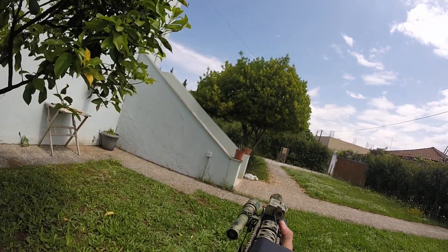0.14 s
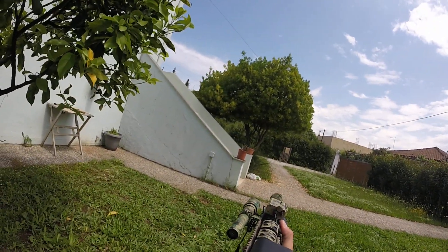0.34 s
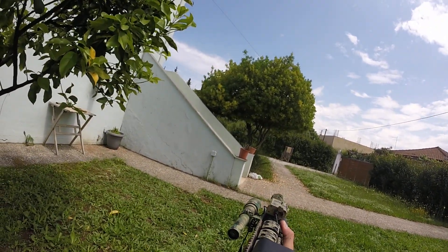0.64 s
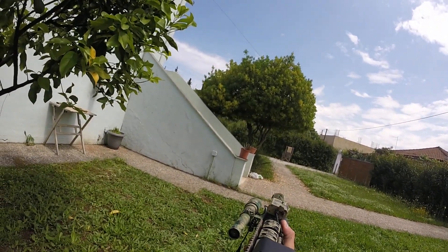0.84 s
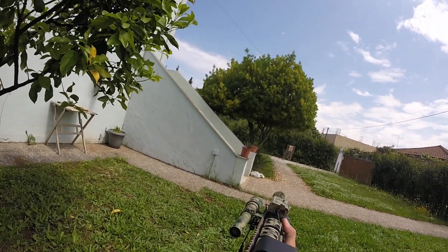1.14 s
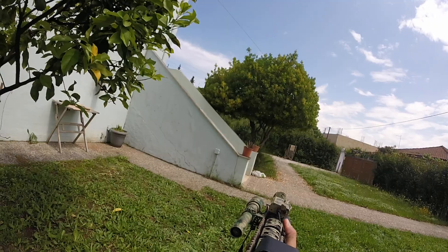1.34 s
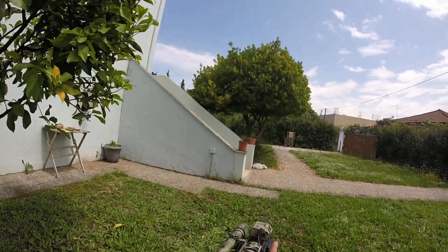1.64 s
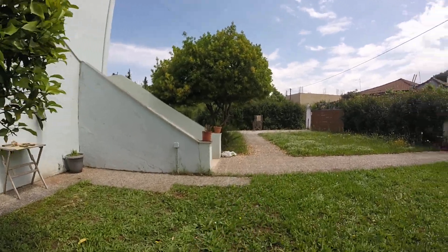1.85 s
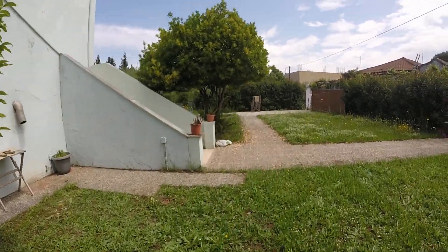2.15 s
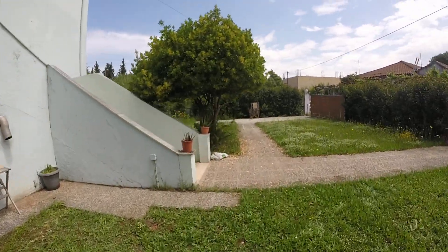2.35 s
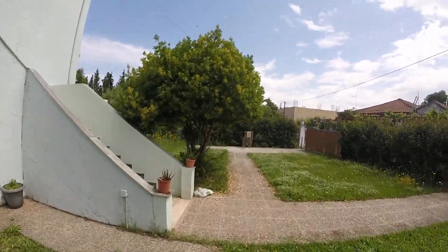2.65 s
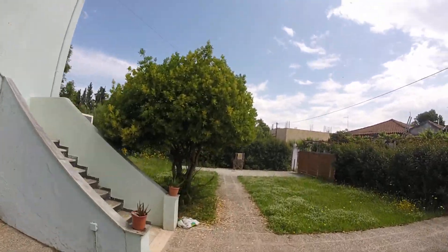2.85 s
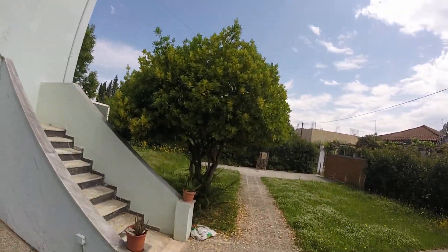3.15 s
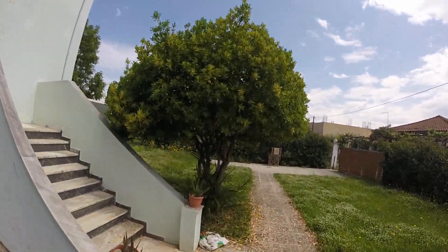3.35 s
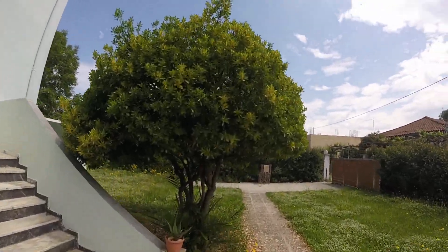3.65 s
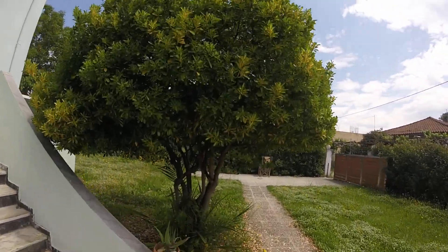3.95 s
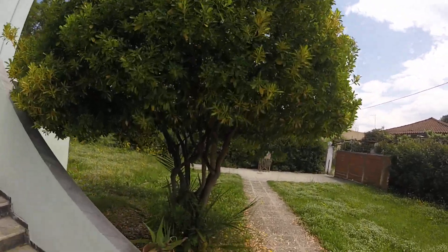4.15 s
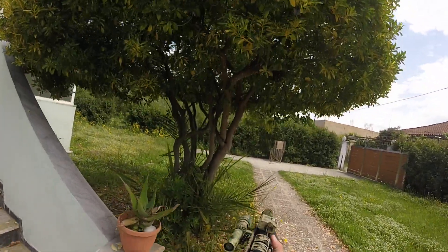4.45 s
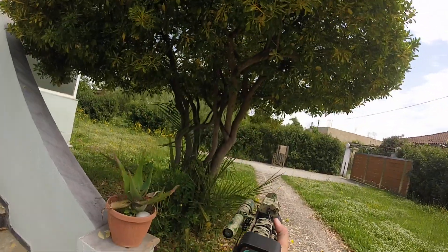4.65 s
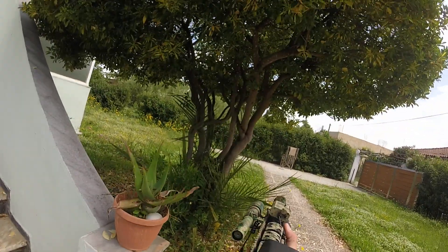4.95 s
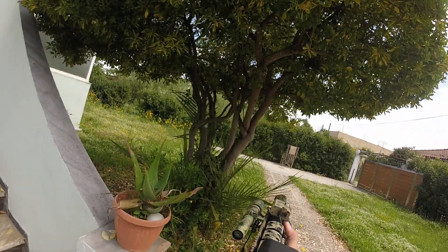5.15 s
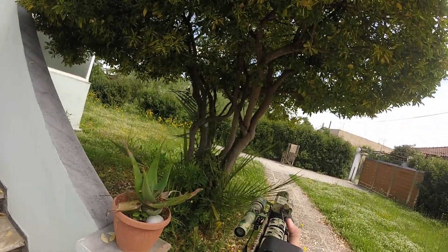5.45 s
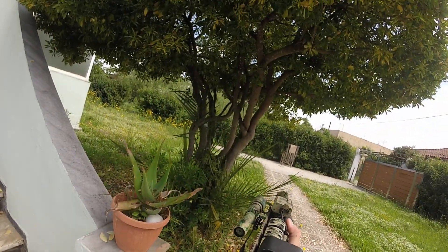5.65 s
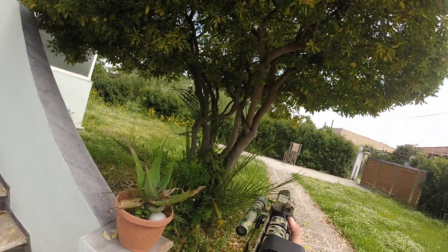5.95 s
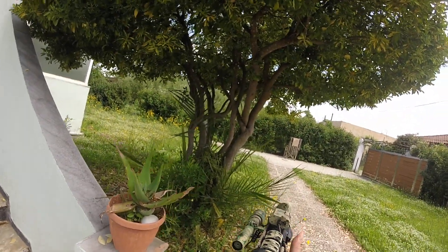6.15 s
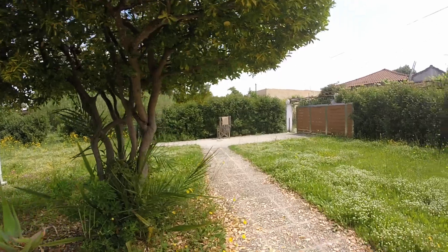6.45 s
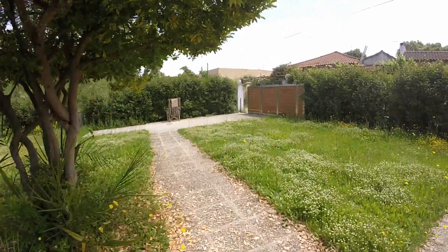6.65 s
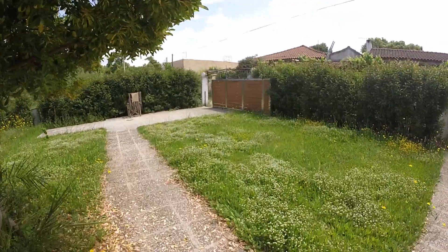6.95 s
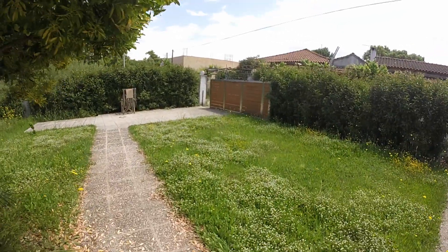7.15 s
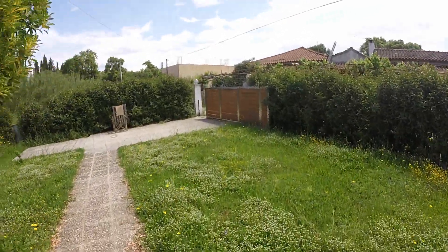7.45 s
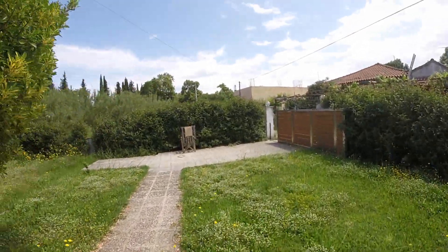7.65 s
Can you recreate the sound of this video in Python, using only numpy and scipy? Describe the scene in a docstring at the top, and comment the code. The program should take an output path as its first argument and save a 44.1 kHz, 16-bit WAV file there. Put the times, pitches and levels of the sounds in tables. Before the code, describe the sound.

A quiet garden opens with soft wind on the microphone, a distant hush, a low engine drone fading within the first second and one faint chirp. At 1.07 s a trigger clicks; from 1.15 s an electric airsoft rifle fires four dry, clacking shots at about 14 per second, its gears whirring and rasping between slams, with a thin bright echo. Faint metal pings answer from afar, and a latch clacks with a bounce at 1.47 s. From 1.9 to 4.4 s the shooter walks: dull bumps, cloth rustle, small clicks and hollow case knocks, hardest at 3.4 and 3.77 s, with birds and a faint falling whine near 3 s. After a lull with light chirps at 5 s, six shots run from 5.66 to 6.0 s, ending in a latch clack at 6.12 s. Clicks, rustles, soft knocks and rising gusts continue to about 8 s.

```python
"""A breeze brushes the microphone over a distant hush and engine drone, small birds twitter, then an electric
airsoft rifle fires a burst in a walled garden, heard from a camera worn by the shooter; a longer one follows.
Its gears whirr, wind the spring and let the piston slam about 14 times a second; the walls return an echo and
the first burst's pellets ping on metal far off. As the shooter walks, the camera case knocks and kit rustles.
Noise is filtered for wind, gears, cloth and hush; decaying sines ring for struck parts; swept sines whistle."""
import sys
import numpy as np
from scipy import signal
from scipy.fft import rfft, irfft
from scipy.io import wavfile
from scipy.ndimage import uniform_filter1d, minimum_filter1d

SR = 44100
rng = np.random.default_rng(int(sys.argv[2]) if len(sys.argv) > 2 else 0)


def transcribe(signal):
    """Save signal, clipped to [-1, 1], as a 16-bit WAV file at the path in sys.argv[1]."""
    frames = np.atleast_2d(signal).T
    limited = np.clip(frames, -1, 1)
    pcm = np.round(limited * 32767).astype(np.int16)
    wavfile.write(sys.argv[1], SR, pcm)


N = 344362
T = np.arange(N) / SR   # s
AGE = T[:SR // 2]   # s since a blow

# In every colour table the levels are relative: the filter keeps the power of white noise.
# Colour of the far outdoor hush. Each row: frequency in Hz, level in dB per Hz.
HUSH_COLOUR = [(88, -40), (150, -5), (205, -12), (258, -10.5), (404, -16), (781, -13), (877, -14.5),
               (1130, -14), (1510, -17), (1700, -23), (2100, -27), (3350, -33.5), (5650, -40),
               (13300, -54.5), (15500, -82)]
HUSH_DB = -45
# Low rumble of wind at the microphone. Each row: frequency in Hz, level in dB per Hz.
RUMBLE_COLOUR = [(12, -50.5), (20, -3.5), (44, 6), (60, 2), (76, 3), (107, -0.5), (189, -20), (296, -15.5),
                 (400, -21), (520, -41.5), (880, -120)]
# Eddies of the stronger wind. Each row: frequency in Hz, level in dB per Hz.
EDDY_COLOUR = [(50, -17.5), (130, 7.0), (250, -1.0), (450, -11.0), (2000, -55.0)]
# Gusts at the microphone. Each row: strongest moment in seconds, half width in seconds, flow in dB.
GUSTS = [(.3, 0.77, -40.5), (2, 0.6, -45), (4.901, 0.46, -55), (7.5, .12, -37), (7.8, 0.18, -35)]
BREEZE_DB, LUMPY_DB = -43, 1.6   # flow between gusts; spread of its quick flutter
# Lines of the distant engine. Each row: frequency in Hz, level in dB.
DRONE_LINES = [(54, 0), (108, -3), (152, -36)]
DRONE_DB, DRONE_ATTACK_S, DRONE_HOLD_S, DRONE_RELEASE_S = -28.5, 0.15, 0.39, 0.33
# Small birds. Each row: start in seconds, starting pitch in Hz, level in dB.
CHIRPS = [(.45, 3270, -54), (3.03, 3500, -52), (3.455, 4680, -53.5), (3.638, 3430, -47), (5.022, 3180, -57),
          (5.052, 3200, -53.5)]
CHIRP_S, CHIRP_RISE = 0.019, 1.5   # length; end pitch over starting pitch

# Bursts of the rifle. Each row: trigger pulled in seconds, first slam in seconds, number of shots,
# time lost while the motor gathers speed in seconds, latch drops in seconds, latch level in dB.
BURSTS = [(1.066, 1.149, 4, .008, 1.4734, -7.5), (5.586, 5.657, 6, .012, 6.1183, -5)]
SHOT_PERIOD_S, LAG_LEFT = .069, .15   # at full rate; share of the lag left after each shot
# The trigger's click: level in dB, brightness in Hz, time to fall 60 dB in seconds.
TRIGGER_CLICK = (-21.5, 5400, 0.015)
LATCH_HZ, LATCH_T60_S = 15000, 0.035   # brightness and decay of the latch's clack
REBOUND_S, REBOUND_DB, REBOUND_T60_S = .0195, -6.5, 0.064   # its one bounce: delay, level against the drop
# Colour of the gearbox close by. Each row: frequency in Hz, level in dB per Hz.
GEARBOX_COLOUR = [(120, -62), (200, -11), (430, -4.5), (554, -8.5), (874, 2), (1030, -4.5), (1430, 0.5),
                  (1810, -13), (2130, -15), (2470, -16.5), (5490, -18.5), (7090, -18.5), (8050, -23),
                  (11600, -23.5), (15500, -40)]
# Resonances of the gearbox. Each row: frequency in Hz, width in Hz, lift in dB.
GEARBOX_PEAKS = [(427, 29, 2.2), (960, 19, 3.8), (1450, 210, 2.1), (1947, 220, 7.7), (2430, 250, 8.3),
                 (2820, 35, 1.7), (3920, 400, 7.3), (4260, 99, 7.8), (6130, 110, 8), (7040, 230, 3.6)]
# Receiver ringing when struck. Each row: frequency in Hz, level in dB, time to fall 60 dB in seconds.
RECEIVER_MODES = [(213, -19, 0.073), (476, -2.5, 0.041), (843, 1, 0.052), (893, -15.5, 0.046),
                  (1106, 1.5, 0.021), (1487, -10, 0.039)]
# Rasp of strained teeth. Each row: frequency in Hz, level in dB per Hz.
RASP_COLOUR = [(700, -28), (1300, 1.0), (1700, 5.0), (2200, -3), (3000, 1.0), (4600, -11.5),
               (5500, -41.5), (12000, -39)]
# Resonance of that rasp. Each row: frequency in Hz, width in Hz, lift in dB.
RASP_PEAKS = [(2670, 360, 3)]
START_SPEED, SPIN_UP_S, COAST_S = .3, .016, .108   # share of full speed at once; run-up; run-down
GEARS_DB, SPEED_EXPONENT = -20, 2.16   # gears at full speed; growth of their gain with speed
TOOTH_HZ, SPRING_SAG = 964, .15   # free tooth rate; share lost against the fully wound spring
PICKUP_S, PICKUP_WIDTH_S, PICKUP_DB = 0.02, 0.0041, 3.5   # after a slam the gear catches the piston again
SHAKE_DB, SHAKE_S = 1, .006   # a slam shakes the gears into a brief clatter
FREE_DB, FREE_S = -9, .0055   # the gears spin unloaded while the piston flies
SHOT_DB, FIRST_SHOT_LIFT_DB, SLAM_DB = -3.3, 2, 2.5   # shot force; lift of the first; slam within a shot
# The slam builds up as the piston squeezes its air, then the shooter's grip damps it.
CUSHION_S, DAMPING_S = .0022, .007
# Echo off the garden's leaves and walls. Each row: frequency in Hz, level in dB per Hz.
ECHO_COLOUR = [(200, -31), (700, -11), (1800, -4.5), (4000, 6), (7000, 6), (12000, 4.5), (16000, 7.5)]
ECHO_DB = -13
# Far metal hit by pellets. Each row: frequency in Hz, level in dB, time to fall 60 dB in seconds.
METAL_MODES = [(3710, 16, 0.06), (3940, 3, .2), (10605, 0.5, 0.16), (11450, -1, 0.12)]
# Pings, one for each pellet of the first burst. Each entry: peak in dB.
PING_DB = [-57, -51, -34.5, -45.5]
PELLET_FLIGHT_S = .282

# Dull bumps through the camera mount. Each row: start in seconds, level in dB, frequency in Hz.
BUMPS = [(1.929, -21, 101), (2.572, -22, 172), (3.338, -9, 159), (3.379, -13, 143), (7.63, -13, 122)]
# Strokes of sleeves and kit by the microphone. Each row: start in seconds, length in seconds, level in dB.
BRUSHES = [(2.108, 0.62, -51.5), (2.75, 0.41, -49), (4.289, 0.049, -40.5), (6.314, 0.35, -53.5),
           (6.717, 0.31, -46.5), (7.045, 0.11, -31.5), (7.134, 0.11, -43), (7.481, 0.11, -35),
           (7.58, 0.093, -45), (7.737, 0.081, -42.5)]
# Colour of cloth. Each row: frequency in Hz, level in dB per Hz.
CLOTH_COLOUR = [(400, 1), (900, 5), (1500, 2.5), (2500, -5.5), (4000, -9.5), (7000, -17.5), (11000, -21),
                (15000, -32)]
# Gritty low catch of cloth. Each row: frequency in Hz, level in dB per Hz.
CATCH_COLOUR = [(600, -32), (1100, 4), (1600, -4), (2400, -14.0), (4000, -26), (10000, -35)]
# Loose parts of the rifle. Each row: start in seconds, level in dB, brightness in Hz,
# time to fall 60 dB in seconds.
LOOSE_CLACKS = [(2.195, -24, 1030, 0.027), (2.221, -29, 1150, 0.073), (2.538, -25.5, 890, 0.013),
                (6.425, -21.5, 1950, 0.035), (6.791, -20.5, 1080, .008), (6.812, -20, 1770, .004),
                (6.819, -16.5, 1700, .019), (6.827, -23.5, 2500, 0.039), (7.504, -18.5, 1550, 0.058),
                (7.522, -8, 3400, 0.0065), (7.56, -19.5, 2980, 0.0086)]
# Knocks of the camera case. Each row: start in seconds, hollow thud in dB, hard snap in dB.
KNOCKS = [(2.571, -23, -42), (3.164, -18, -36), (3.26, -7.5, -26), (3.286, -7.5, -18.5), (3.3115, -21, -33),
          (3.335, -12, -38), (3.38, -18, -27), (3.3998, 4, 3.5), (3.4117, -7.5, -8.5), (3.6931, -10, -26),
          (3.745, -24, -33), (3.7702, -1.5, -1), (3.7885, -6.5, -11), (4.1096, -13.5, -38),
          (4.156, -15, -23.5), (4.202, -15.5, -27), (4.352, -15, -44), (4.4, -21, -59), (7.131, -26, -45),
          (7.198, -21.5, -54), (7.336, -24.5, -54), (7.63, -14.5, -39)]
# Hollow shell of the case. Each row: frequency in Hz, level in dB, time to fall 60 dB in seconds.
SHELL_MODES = [(322.4, -0.5, 0.032), (456, -2.5, 0.024), (670, -1, 0.0095), (792, -4, .028),
               (970, -4.5, 0.019), (1100, -7, 0.019), (1370, -2, 0.0083)]
# Stiff walls of the case. Each row: frequency in Hz, level in dB, time to fall 60 dB in seconds.
WALL_MODES = [(2333, -1.5, 0.032), (3007, -4.5, 0.026), (3500, -3.5, .016), (3560, -11, 0.035),
              (4552, -7, 0.034), (5630, -8, 0.017), (7000, -4, 0.0081), (7480, -9, 0.012),
              (9360, -19, 0.01), (10580, -17.5, 0.015)]
CHATTER = .3   # strength of the tiny rebounds within a knock
# Faint far whine. Each row: start in seconds, length in seconds, level in dB.
FAR_WHINES = [(2.8, .5, -47)]
WHINE_HZ, WHINE_SAG_HZ_PER_S = 1240, 290
# The case drags in its mount. Each row: start in seconds, length in seconds, level in dB.
DRAGS = [(3.26, 0.18, -30.5), (3.685, 0.062, -21.5), (4.045, 0.1, -34), (4.33, 0.055, -45)]
CUTOFF_HZ = 15600   # top of the recorded band


def from_db(db):
    """Decibels to gain."""
    return 10 ** (np.asarray(db) / 20)


def rms_one(x):
    """Scale to unit rms."""
    return x / np.sqrt(np.mean(x ** 2) + 1e-20)


def peak_one(x):
    """Scale to unit peak."""
    return x / (np.abs(x).max() + 1e-20)


def noise(size=N):
    """White noise of spread 1."""
    return rng.standard_normal(size)


def add(out, s, sound):
    """Mix a sound in at a time."""
    i = round(s * SR)
    out[i:i + len(sound)] += sound[:N - i]


def fade(t60):
    """Exponential decay after a blow, 60 dB in t60 seconds."""
    return from_db(-60 * AGE / max(t60, 1e-3))


def ring(hz, t60):
    """One decaying sine after a blow."""
    return np.sin(2 * np.pi * hz * AGE) * fade(t60)


def swells(rows):
    """Strokes that rise quickly and ease off."""
    return sum(from_db(db) * np.sin(np.pi * np.clip((T - s) / length, 0, 1) ** .7) for s, length, db in rows)


def drift(rate):
    """Random wander of unit rms, with straight lines between `rate` fresh values a second."""
    knots = np.arange(0, T[-1] + 1, 1 / rate)
    return rms_one(np.interp(T, knots, noise(len(knots))))


def lowpass(x, hz):
    """Second-order low-pass."""
    return signal.sosfilt(signal.butter(2, min(hz, SR * .45), fs=SR, output="sos"), x + 1e-18)


def colour(x, spectrum, peaks=(), size=4096):
    """Causal filter with a smooth spectrum and resonances on top; white noise keeps its power."""
    hz = np.maximum(np.fft.rfftfreq(size, 1 / SR), 1)
    points = np.array(spectrum)
    db = np.interp(np.log(hz), np.log(points[:, 0]), points[:, 1])
    for centre, width, lift in peaks:
        db = db + lift / (1 + (2 * (hz - centre) / width) ** 2)
    # the folded cepstrum gives a minimum-phase response
    cepstrum = irfft(np.log(from_db(db)))[:size // 2]
    response = irfft(np.exp(2 * rfft(cepstrum, size)))
    return signal.oaconvolve(x, response / np.linalg.norm(response))[:len(x)]


def struck(modes, spread_db, detune=0):
    """Modes of alternating sign ring after a blow, each with a strength of its own."""
    gains = from_db(spread_db * noise(len(modes)))
    shifts = 1 + detune * noise(len(modes))
    total = np.zeros(len(AGE))
    for k, (hz, db, t60) in enumerate(modes):
        total += (-1) ** k * gains[k] * from_db(db) * ring(hz * shifts[k], t60)
    return peak_one(total)


def hush():
    """Steady distant outdoor hush: coloured noise."""
    return from_db(HUSH_DB) * colour(noise(), HUSH_COLOUR)


def wind(buffet_db=-11, buffet_exponent=1.79):
    """A lumpy breeze on the microphone, whose eddies reach higher in the gusts."""
    gusts = sum(from_db(db) * np.exp(-((T - s) / width) ** 2) for s, width, db in GUSTS)
    flow = from_db(BREEZE_DB) + gusts
    rumble = colour(noise(), RUMBLE_COLOUR)
    eddies = colour(noise(), EDDY_COLOUR)
    buffet = from_db(buffet_db) * (flow / np.mean(flow)) ** buffet_exponent
    return flow * from_db(LUMPY_DB * drift(14)) * (rumble + buffet * eddies)


def engine():
    """A distant engine drones and fades: low sines that share one unsteady pitch."""
    wander = np.cumsum(1 + 0.021 * drift(8)) / SR
    turns_s = np.cumsum([0, DRONE_ATTACK_S, DRONE_HOLD_S, DRONE_RELEASE_S])
    throttle = np.interp(T, turns_s, [0, 1, 1, 0])
    lines = sum(from_db(DRONE_DB + db + 2 * drift(8.8)) * np.sin(2 * np.pi * hz * wander)
                for hz, db in DRONE_LINES)
    return throttle * lines


def birds():
    """Small birds twitter: short rising whistles."""
    out = np.zeros(N)
    for s, hz, db in CHIRPS:
        glide_hz = np.linspace(hz, hz * CHIRP_RISE, round(CHIRP_S * SR))
        whistle = np.sin(2 * np.pi * np.cumsum(glide_hz) / SR)
        add(out, s, from_db(db) * np.hanning(len(whistle)) * whistle)
    return out


def clack(t60, bright_hz):
    """A chatter of contacts in the gearbox that builds up and dies quickly."""
    contacts = np.tanh(2 * noise(len(AGE))) * (fade(t60) - 0.95 * fade(t60 / 4))
    return peak_one(lowpass(colour(contacts, GEARBOX_COLOUR, GEARBOX_PEAKS), bright_hz))


def clacks(rows, hollow_db=-10):
    """Contacts on the rifle; the duller ones bring out more of the hollow receiver."""
    out = np.zeros(N)
    for s, db, bright_hz, t60 in rows:
        receiver = peak_one(lowpass(struck(RECEIVER_MODES, 1.8), 590))
        hollow = from_db(hollow_db) * min(2000 / bright_hz, 1) * receiver
        add(out, s, from_db(db) * (clack(t60, bright_hz) + hollow))
    return out


def latches():
    """The trigger clicks; after a burst the gear train drops back on its latch and bounces once."""
    rows = []
    for trigger_s, *_, latch_s, latch_db in BURSTS:
        rows += [(trigger_s, *TRIGGER_CLICK),
                 (latch_s, latch_db, LATCH_HZ, LATCH_T60_S),
                 (latch_s + REBOUND_S, latch_db + REBOUND_DB, LATCH_HZ, REBOUND_T60_S)]
    return clacks(rows)


def slam_times(first_s, count, lag_s):
    """Evenly spaced shots, the later ones set back a little while the motor gathers speed."""
    k = np.arange(count)
    return first_s + k * SHOT_PERIOD_S + lag_s * (1 - LAG_LEFT ** k)


def drive():
    """Motor speed (0-1), spring tension (0-1) and gear loudness (gain) through all bursts."""
    speed, tension, loudness = np.zeros((3, N))
    for trigger_s, first_s, count, lag_s, latch_s, _ in BURSTS:
        on = (T >= trigger_s) & (T < latch_s)
        t, slams = T[on], slam_times(first_s, count, lag_s)
        starts = np.append(trigger_s, slams)   # each winding of the spring
        since = t - starts[np.searchsorted(starts, t, side="right") - 1]
        run_up = 1 - (1 - START_SPEED) * np.exp(-(t - trigger_s) / SPIN_UP_S)
        run_down = 1 - np.clip((t - slams[-1]) / COAST_S, 0, 1) ** 2
        shake_db = SHAKE_DB * np.exp(-since / SHAKE_S)
        pickup_db = PICKUP_DB * np.exp(-((since - PICKUP_S) / PICKUP_WIDTH_S) ** 2)
        clatter_db = np.where(t < first_s, 0, shake_db + pickup_db)
        flying = ((t[:, None] > slams - FREE_S) & (t[:, None] < slams)).any(axis=1)
        speed[on] = run_up * run_down
        tension[on] = np.clip(since / SHOT_PERIOD_S, 0, 1)
        loudness[on] = speed[on] ** SPEED_EXPONENT * from_db(GEARS_DB + FREE_DB * flying + clatter_db)
    return speed, tension, loudness


def gears(teeth_db=-9, mesh_db=-11, pinion_db=-15, pinion_ratio=5.4, jitter=.03,
          strain_db=-7, strain_rise_db=4, radiates_hz=480):
    """Teeth mesh and grind; they speed up after each slam and slow as the spring is wound."""
    speed, tension, loudness = drive()
    tooth_hz = TOOTH_HZ * speed * (1 - SPRING_SAG * tension) * (1 + jitter * drift(250))
    turns = np.cumsum(tooth_hz) / SR
    # one impulse for each tooth that passes
    teeth = np.diff(np.floor(turns), prepend=0) * from_db(2 * drift(700))
    teeth = from_db(teeth_db) * rms_one(teeth) * np.sqrt(np.mean(speed))
    grind = rms_one(noise() * from_db(2 * drift(1200)))
    whirr = rms_one(colour(grind + teeth, GEARBOX_COLOUR, GEARBOX_PEAKS))
    mesh = from_db(mesh_db) * np.sin(2 * np.pi * turns)
    pinion = from_db(pinion_db) * np.sin(2 * np.pi * pinion_ratio * turns)
    whine = (mesh + pinion) * from_db(1.0 * drift(120))
    # against the tight spring the teeth rasp in a middle band
    rasp = colour(noise(), RASP_COLOUR, RASP_PEAKS) * from_db(2.04 * drift(150))
    strain = from_db(strain_db + strain_rise_db * tension)
    running = (whirr + strain * rasp + whine) * loudness
    # the small gearbox radiates little bass
    return signal.sosfilt(signal.butter(2, radiates_hz, "high", fs=SR, output="sos"), running + 1e-18)


def piston(flight_s=.0072, seat_s=0.00027, recoil_hz=150, recoil_db=-8, release_db=-14,
           stock_hz=400, stock_db=-14, crack_db=-11):
    """The gear lets go with a tick, the spring shoves the rifle back, then the piston hits the cylinder head."""
    out = np.zeros(N)
    squeeze = np.minimum(AGE / CUSHION_S, 1) * np.exp(-AGE / DAMPING_S)
    for _, first_s, count, lag_s, *_ in BURSTS:
        for k, s in enumerate(slam_times(first_s, count, lag_s)):
            force = from_db(SHOT_DB + FIRST_SHOT_LIFT_DB * (k == 0))   # the first is harder
            recoil = -from_db(recoil_db) * ring(recoil_hz, 0.043)
            stock = from_db(stock_db) * ring(stock_hz, 0.021)
            release = from_db(release_db) * clack(0.0021, 17000)
            slam = from_db(SLAM_DB) * peak_one(struck(RECEIVER_MODES, .8) * squeeze)
            crack = from_db(crack_db) * clack(0.0063, 11000)
            add(out, s - flight_s, force * (recoil + stock + release))
            add(out, s + seat_s, force * (slam + crack))
    return out


def garden(x, t60=0.37, wall_s=0.086):
    """Leaves and walls scatter a thin, bright echo."""
    scatter = noise(len(AGE)) * fade(t60) * np.minimum(AGE / wall_s, 1) ** 2
    sent = colour(x * from_db(ECHO_DB), ECHO_COLOUR)
    return signal.oaconvolve(sent, scatter / np.linalg.norm(scatter))[:N]


def pellets():
    """Thin rings from metal hit far away by the first burst, smeared by leaves and walls."""
    out = np.zeros(N)
    _, first_s, count, lag_s, *_ = BURSTS[0]
    for s, db in zip(slam_times(first_s, count, lag_s), PING_DB):
        scatter = noise(len(AGE)) * fade(0.36)
        ping = peak_one(signal.fftconvolve(struck(METAL_MODES, 1), scatter))
        add(out, s + PELLET_FLIGHT_S, from_db(db) * ping)
    return out


def mount_bumps():
    """Dull bumps through the mount: short low sines."""
    out = np.zeros(N)
    for s, db, hz in BUMPS:
        add(out, s, -from_db(db) * peak_one(lowpass(ring(hz, 0.029), 300)))
    return out


def clothing(catch_db=-3):
    """Fibres catch and slip in fine grains with each stroke of a sleeve or the kit."""
    grains = rms_one(colour(noise() * from_db(2.4 * drift(500) + 2 * drift(60)), CLOTH_COLOUR))
    # a stroke starts with a gritty low catch and then brightens
    catch = colour(noise() * from_db(2.8 * drift(400)), CATCH_COLOUR)
    starts = swells([(s, length / 2, db + catch_db) for s, length, db in BRUSHES])
    slides = swells([(s + length / 4, length * .75, db) for s, length, db in BRUSHES])
    return grains * slides + catch * starts


def loose_parts():
    """Loose parts click against the hollow receiver as the rifle is carried."""
    return clacks(LOOSE_CLACKS)


def camera_case(crack=0.5, rattle=0.11, soft_hz=5800, tilt_db_per_octave=6, soft_db=-42):
    """The case knocks in its mount: the shell booms, the walls snap under a few ms of chatter."""
    out = np.zeros(N)
    for s, thud_db, snap_db in KNOCKS:
        contact = CHATTER * noise(len(AGE)) * fade(0.0096)
        wobble = rattle * noise(len(AGE)) * fade(0.033)
        contact[0] = wobble[0] = 1   # the blow itself
        # a soft knock mostly wakes the lowest mode
        tilt = tilt_db_per_octave / (1 + from_db(snap_db - soft_db))
        shell = [(hz, db - tilt * np.log2(hz / SHELL_MODES[0][0]), t60) for hz, db, t60 in SHELL_MODES]
        # the grip of the mount shifts the modes from knock to knock
        thud = signal.fftconvolve(wobble, struck(shell, 1.8, detune=.04))[:len(AGE)]
        snap = signal.fftconvolve(contact, struck(WALL_MODES, 3, detune=.025))[:len(AGE)]
        # harder blows are brighter
        bright_hz = min(soft_hz * (1 + from_db(snap_db) ** .5), 9500)
        snap = lowpass(peak_one(snap) + crack * peak_one(contact), bright_hz)
        add(out, s, from_db(thud_db) * peak_one(thud) + from_db(snap_db) * peak_one(snap))
    return out


def far_whine():
    """A faint far whine: an unsteady sine that sinks in pitch."""
    whine_hz = (WHINE_HZ - WHINE_SAG_HZ_PER_S * (T - FAR_WHINES[0][0])) * (1 + 0.021 * drift(180))
    return swells(FAR_WHINES) * np.sin(2 * np.pi * np.cumsum(whine_hz) / SR)


def case_drags():
    """The case drags in its mount: uneven slips keep the shell ringing."""
    slips = noise() * from_db(8.7 * drift(200))
    return swells(DRAGS) * rms_one(signal.oaconvolve(slips, struck(SHELL_MODES, 0.81))[:N])


def scene():
    """Rifle and echo, with the small sounds of the walk and the garden."""
    outdoors = hush() + wind() + engine() + birds() + far_whine()
    rifle = latches() + gears() + piston() + loose_parts()
    worn = mount_bumps() + clothing() + camera_case() + case_drags()
    return (outdoors + rifle + garden(rifle) + pellets() + worn)[None]


def record(dry, ceiling_db=-1.0, release_db_per_s=48, hold_s=0.27):
    """A limiter ducks on hard peaks, holds and recovers slowly; the top is cut."""
    over_db = np.maximum(20 * np.log10(np.abs(dry[0]) + 1e-9) - ceiling_db, 0)
    half = max(int(hold_s * SR / 2), 1)
    # the largest excess within the hold time just past
    held_db = -minimum_filter1d(-over_db, 2 * half + 1, origin=half)
    recovery_db = release_db_per_s * T
    duck_db = np.maximum.accumulate(held_db + recovery_db) - recovery_db
    limited = dry * from_db(-uniform_filter1d(duck_db, size=16))
    return signal.sosfilt(signal.ellip(10, .1, 80, CUTOFF_HZ, fs=SR, output="sos"), limited)


dry = scene()
out = record(dry)
transcribe(out)
```